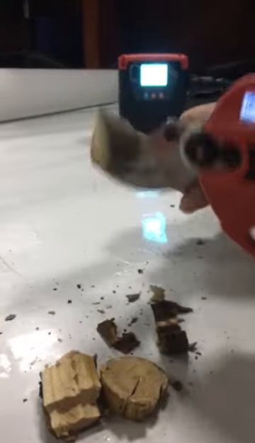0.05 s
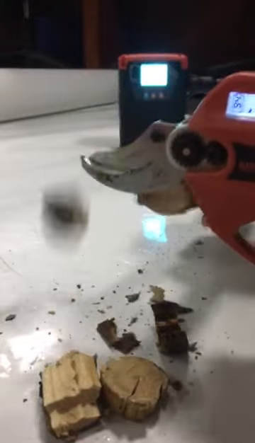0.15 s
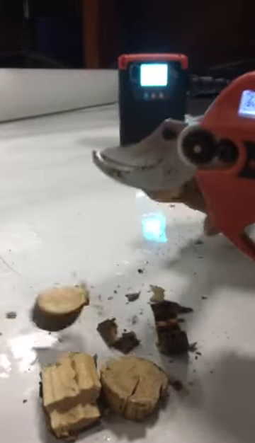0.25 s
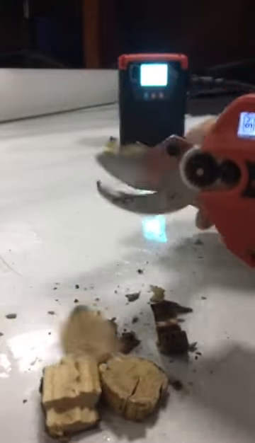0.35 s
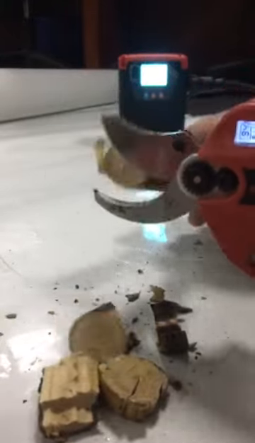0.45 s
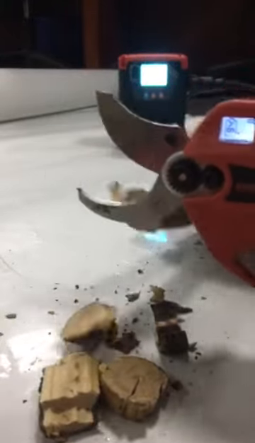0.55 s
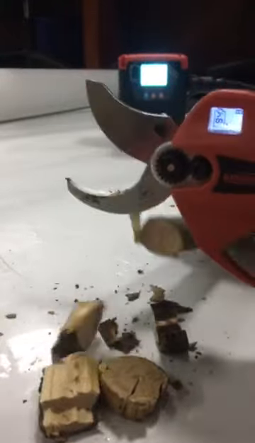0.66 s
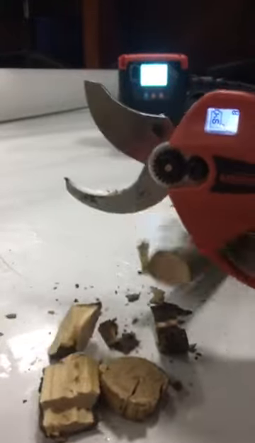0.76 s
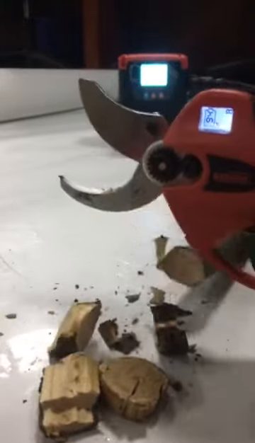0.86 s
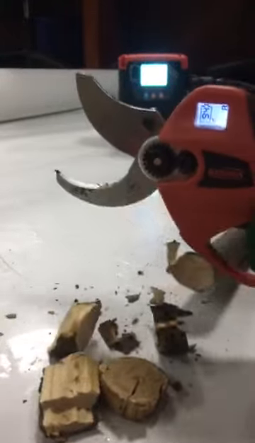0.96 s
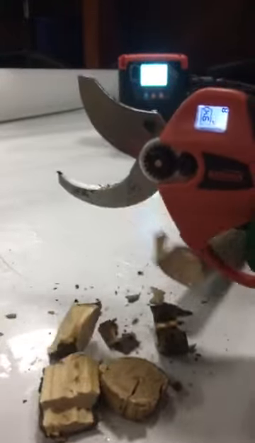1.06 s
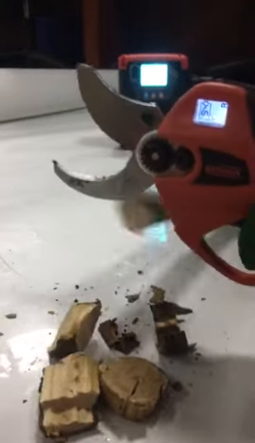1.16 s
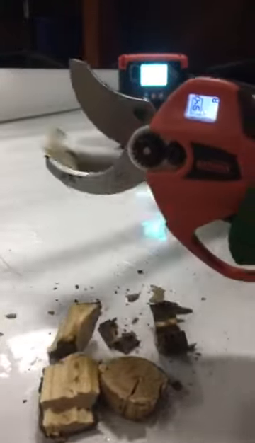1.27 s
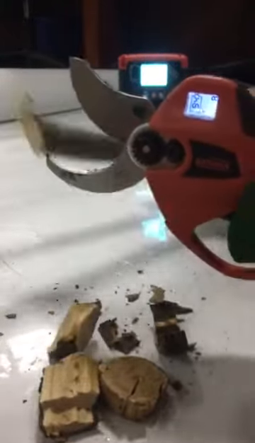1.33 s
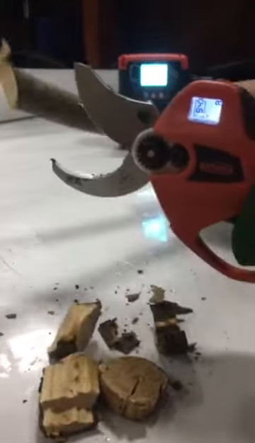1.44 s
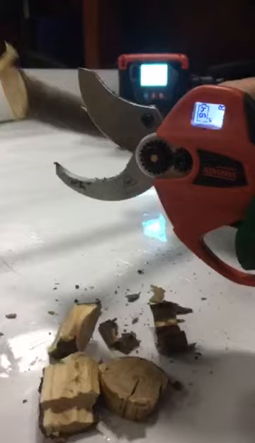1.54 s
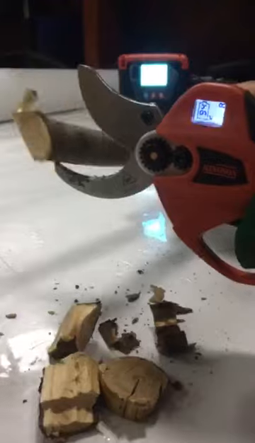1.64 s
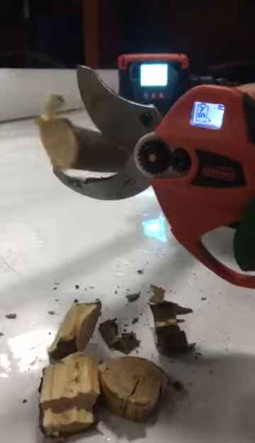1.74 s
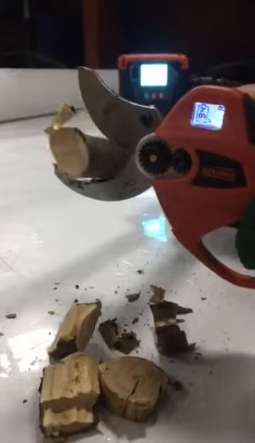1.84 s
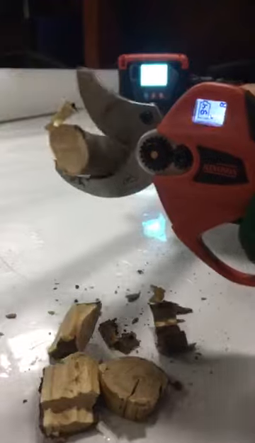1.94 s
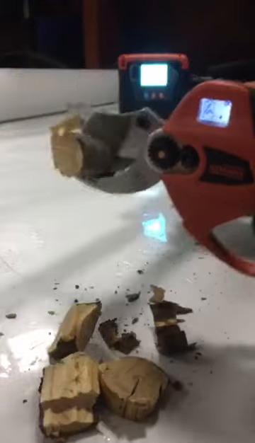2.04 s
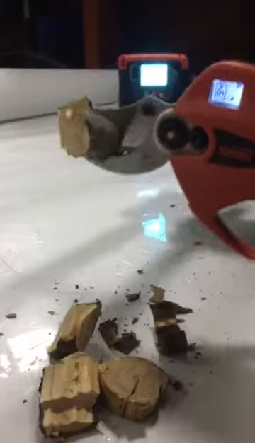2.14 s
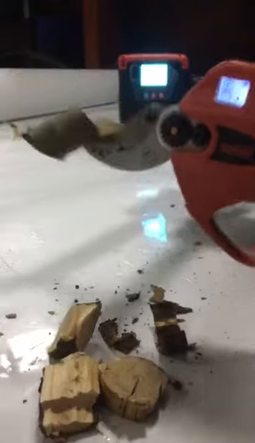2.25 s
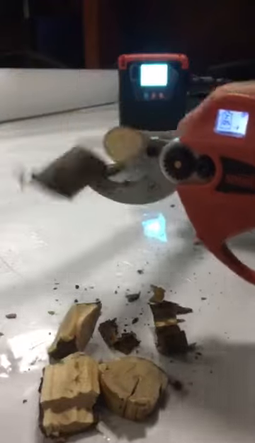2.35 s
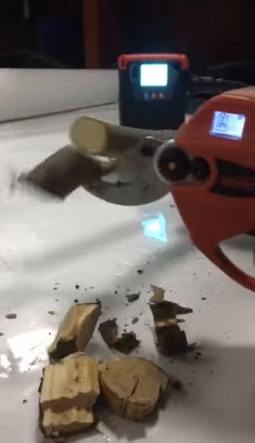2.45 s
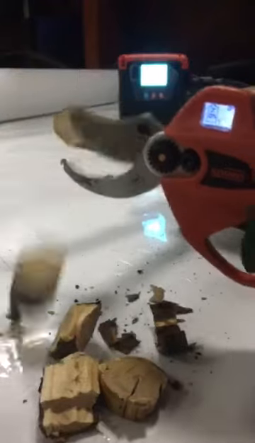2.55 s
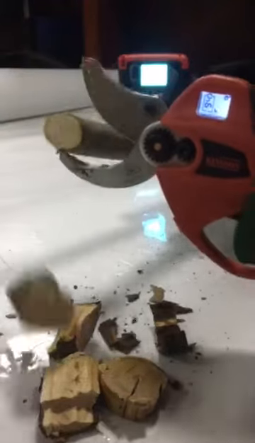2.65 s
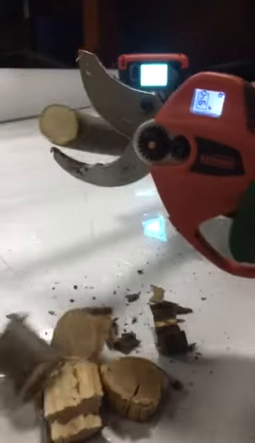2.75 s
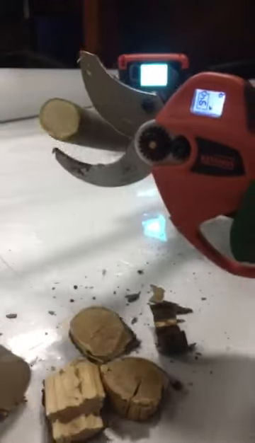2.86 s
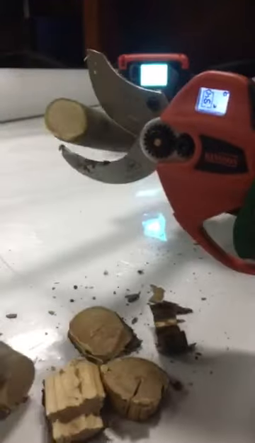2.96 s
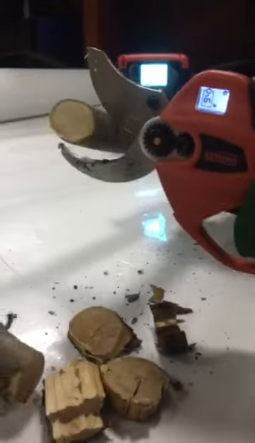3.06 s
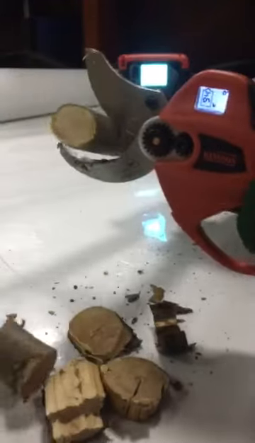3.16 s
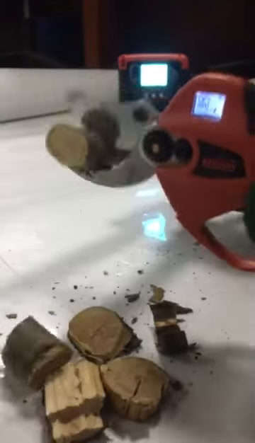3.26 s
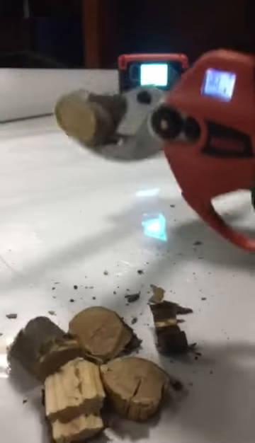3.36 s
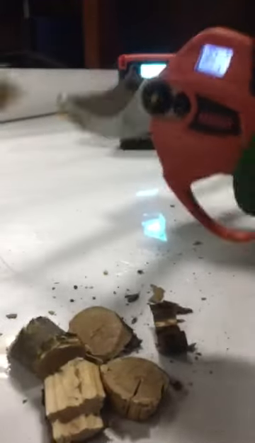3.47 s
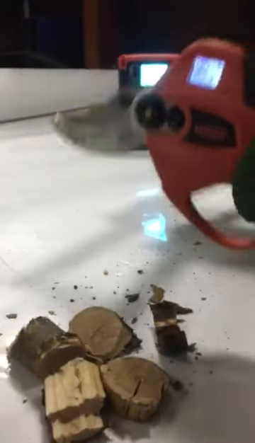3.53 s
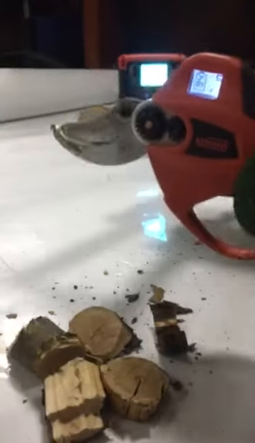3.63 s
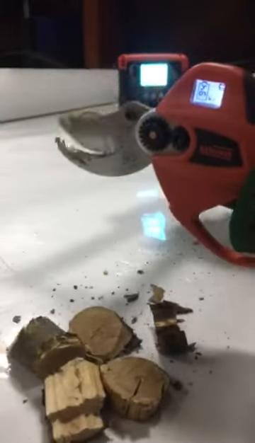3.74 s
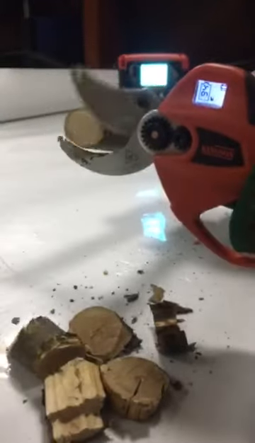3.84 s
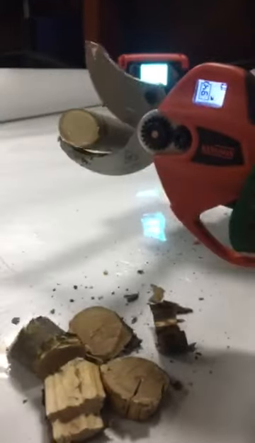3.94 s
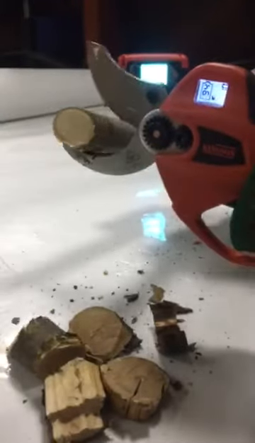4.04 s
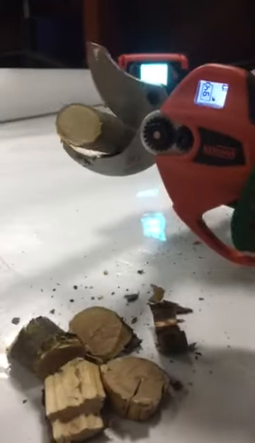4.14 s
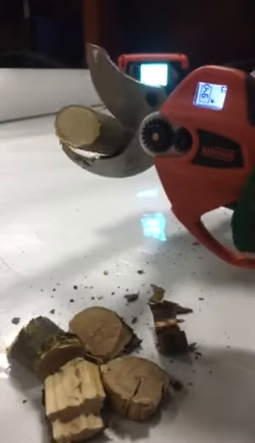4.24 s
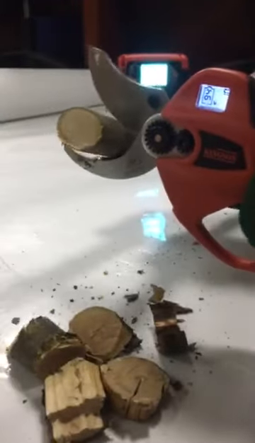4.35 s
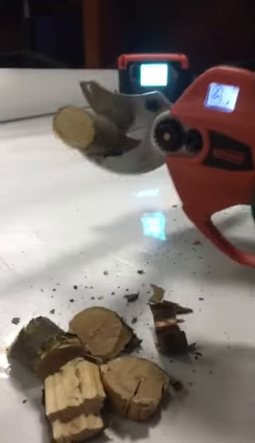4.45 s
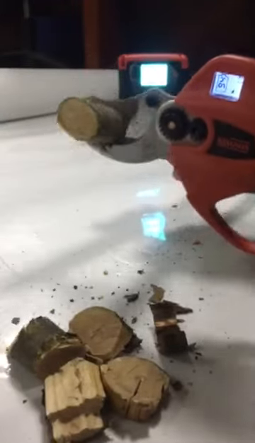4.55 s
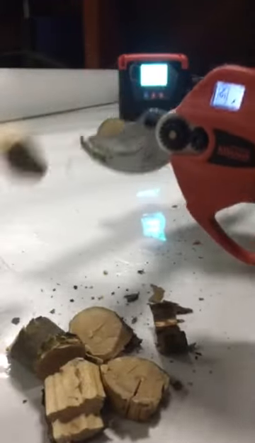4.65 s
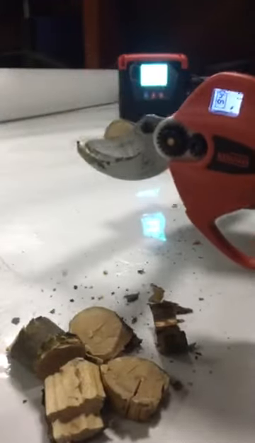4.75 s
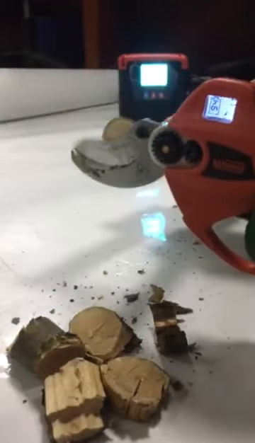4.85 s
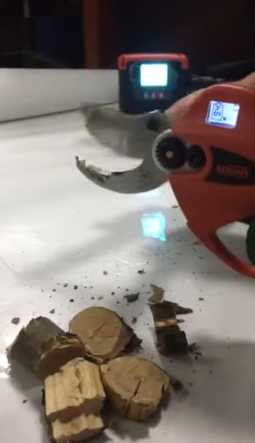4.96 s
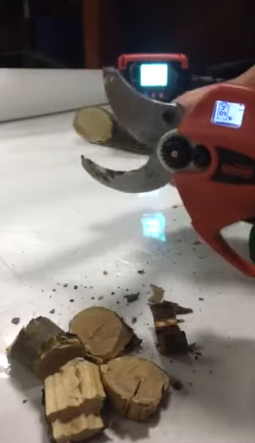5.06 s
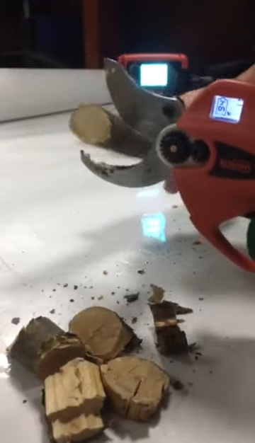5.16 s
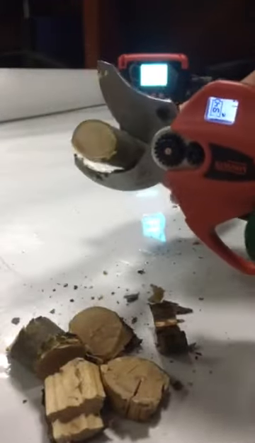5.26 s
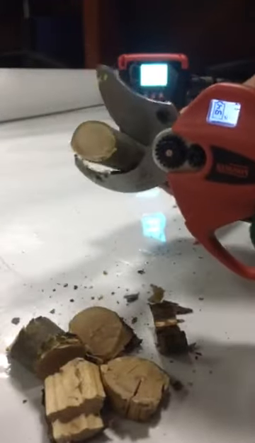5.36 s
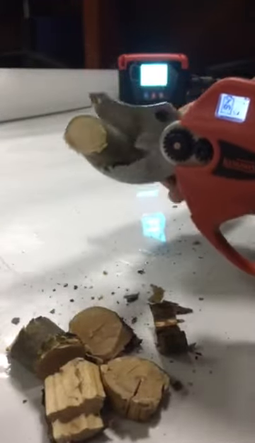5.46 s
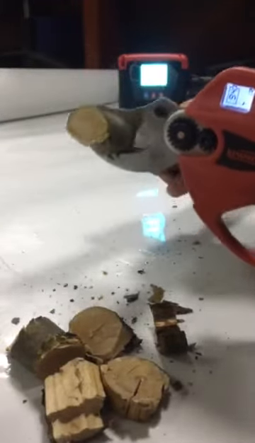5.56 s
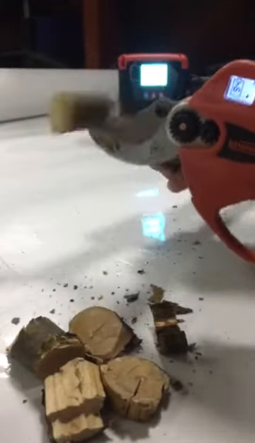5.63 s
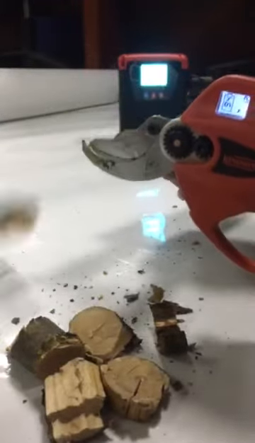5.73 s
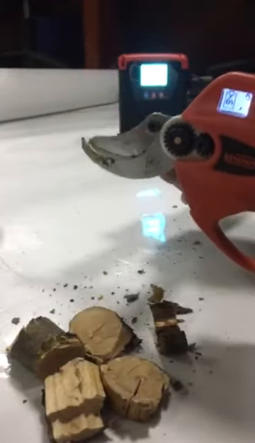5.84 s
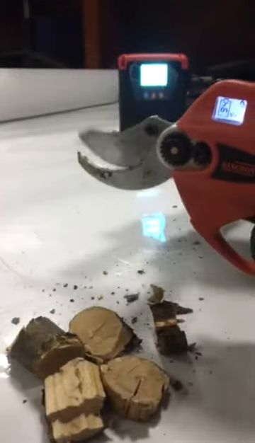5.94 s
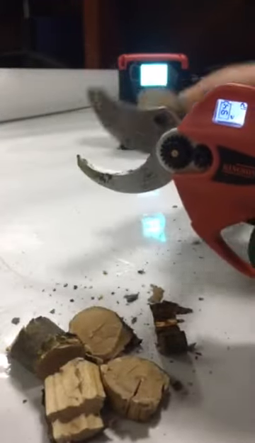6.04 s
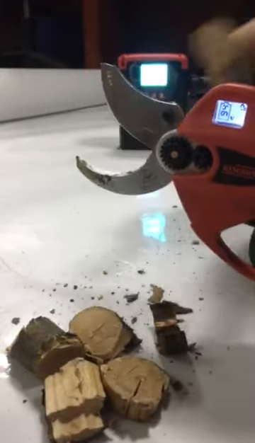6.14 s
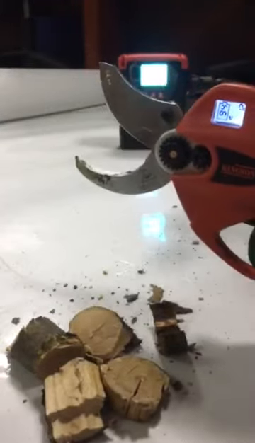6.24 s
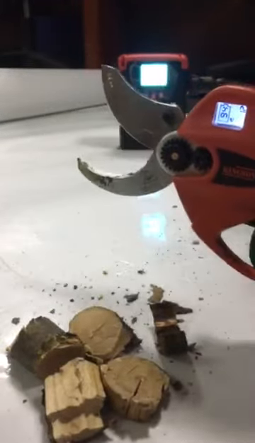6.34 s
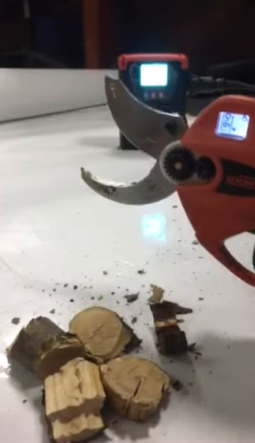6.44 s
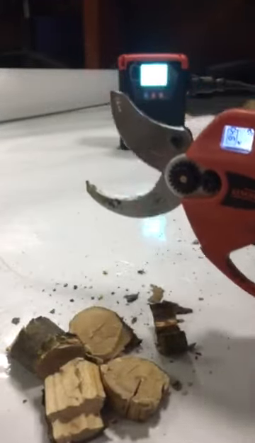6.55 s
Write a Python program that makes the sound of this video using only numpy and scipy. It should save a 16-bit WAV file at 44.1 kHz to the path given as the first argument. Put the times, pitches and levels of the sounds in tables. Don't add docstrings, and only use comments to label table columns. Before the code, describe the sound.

A battery pruning shear whirs and strains through a branch in five strokes, each ending in a sharp wood snap, with slices knocking onto a table.

```python
import sys
import numpy as np
from scipy import signal
from scipy.fft import rfft, irfft
from scipy.io import wavfile
from scipy.ndimage import uniform_filter1d

SR = 44100
rng = np.random.default_rng(int(sys.argv[2]) if len(sys.argv) > 2 else 0)


def output_pcm(signal):
    pcm = np.clip(np.atleast_2d(signal).T, -1, 1) * 32767
    wavfile.write(sys.argv[1], SR, np.round(pcm).astype(np.int16))


def rack_gain(trim_db):
    fader = np.asarray(trim_db, float)
    return 10 ** (fader / 20)


N = 291060

# pitch in Hz, level in dB per Hz.
HUM_COLOUR = [(25, -28), (40, -12.5), (54, 3.5), (66, -3.5), (85, -8.5), (120, -13.5), (160, -48)]
HUM_DB, HUM_SWELL_DB = -53, 1.5
# time in seconds, pitch in Hz, level in dB.
DRONE = [
    (0, 73, -50),
    (.2, 69.4, -41.5),
    (.4, 65.1, -45.5),
    (.6, 63.6, -52),
    (.7, 60, -72),
]
# pitch in Hz, level in dB per Hz.
HISS_COLOUR = [(53, -27), (90, -9.5), (146, -12.5), (171, -11), (232, -13), (423, -26), (528, -21.5),
               (743, -22), (790, -26.5), (1010, -19), (1390, -21.5), (1990, -33), (11000, -66),
               (14300, -82.5), (22000, -120)]
HISS_DB = -56

# time of top speed in seconds, run-up in seconds, gear tone under load in Hz,
# time of the snap in seconds, gear tone at the snap in Hz.
CUTS = [
    (-.15, .118, 2071, .12, 1651),
    (2.088, .116, 1519, 2.298, 2201),
    (3.342, .114, 1570, 3.545, 2052),
    (4.49, .103, 1730, 4.682, 2551),
    (5.523, .108, 1631, 5.71, 2050),
]
LOADED_DB = [-35, -30, -29, -29, -28.5]
SLOT_SHARE_DB = [2.5, -5, -6, -8, -7]
OVERTONE_SHARE_DB = [-3, -1, 0, 0.5, .5]
# time in seconds, width in seconds, gear tone lost in Hz.
KNOT = (.102, .03, 720)
TOP_HZ, SAG_S, RECOVER_S = 3066, .07, .019
ENGAGE = .7
ENGAGE_S = .025
UNLOADED_DB, BITE_S, BITE_DB, BITE_WIDTH_S = -35, 0.027, 4, 0.021
RELIEF_S, RELIEF_DB = .035, -14.5
OVERTONE_DB, OVERTONE_SLOW_DB, CUT_RATTLE_DB = -30, -24, -30.5
SPLINTER_DB = 4

# seconds after the snap, winding whine in dB, gear rattle in dB.
BRAKE = [
    (0, -49, -34.5),
    (.015, -41, -35),
    (.03, -37, -38.5),
    (.045, -51.5, -51.5),
    (.062, -75.5, -73),
]
# seconds after the snap, share of the speed at the snap.
BRAKE_SPEED = [(0, 1), (.012, .97), (.035, .68), (.062, .3)]
# start in seconds, winding whine at full speed in dB.
OPEN_AT = [
    (.366, -42.5),
    (2.524, -55),
    (3.749, -52),
    (4.912, -47),
    (5.954, -47),
]
FREE_TURNS = 287.1
OPEN_RUN_UP_S, OPEN_BRAKE_S, BRAKE_TURNS_PER_S2 = .09, .213, 3160
# seconds after the click, attack, hold and release in seconds, level in dB.
WHINE_UP = (0.02, 0.01, 0.0135, 0.06, -36.5)
# seconds after the click, attack, hold and release in seconds, level in dB.
WHINE_DOWN = (0.2, 0.0436, 0.011, 0.03, -31.5)
# seconds after the click, attack, hold and release in seconds, level in dB.
IDLE_RATTLE = (0.0069, 0.0368, .195, 0.0485, -33)

MESH_ORDER, SLOT_ORDER, POLE_ORDER = 10.85, 12, 28
# beats per turn, level at full speed in dB.
FREE_ORDERS = [(4, -49), (5, -41), (6, -45), (11, -49), (16, -55), (21.7, -43), (24, -55), (28, -41)]
# harmonic number, dB beside the overtone level.
HIGH_MESH = [(2, 0), (3, -3), (4, -7), (5, -6), (6, -8), (7, -8), (8, -11)]
# pitch in Hz, gain in dB.
RADIATION = [(1000, 0), (3500, 0), (4600, 1), (5500, 1), (6500, -2), (8200, -5), (9200, -11), (10800, -2),
             (12000, 1), (14000, -15)]
# pitch in Hz, gain in dB.
MESH_RADIATION = [(1000, -1.5), (1750, 0), (2100, -3.5), (2500, 1), (3100, -2)]
# pitch in Hz, level in dB per Hz.
RATTLE_COLOUR = [(180, -51.5), (300, -28.5), (643, -8), (807, -12.5), (1700, -4.5), (2100, -8),
                 (2770, -7.5), (4970, -5), (5480, -8), (10100, -11.5), (11700, -10.5), (13200, -13),
                 (14500, -25)]
# pitch in Hz, level in dB per Hz.
IDLE_COLOUR = [(300, -21.5), (900, -19), (1500, -14), (2700, -15), (3400, -14), (5400, -10.5), (6200, -9),
               (6700, -15.5), (7100, -7.5), (7700, -15), (8900, -20.5), (10600, -23.5), (12200, -10.5),
               (13600, -23), (14500, -54)]
# pitch in Hz, width in Hz, level in dB.
HOUSING = [(1570, 280, 9.5), (2800, 620, 0.5), (3615, 280, 9), (5440, 370, 3)]
SWITCHING_HZ, SWITCHING_DB = 10050, -60
# pitch in Hz, level in dB per Hz.
SWITCHING_COLOUR = [(4000, -39), (6500, -9), (9500, 7.0), (11500, -4.5), (14000, -39)]

# time in seconds, peak in dB, centre in Hz.
CRACKS = [(0.112, -23, 7050), (0.119, -0.5, 7070), (2.1996, -11.5, 4590), (2.2714, -6.5, 3250),
          (2.279, -6.5, 11100), (2.293, 1, 11700), (2.2975, -14.5, 4390), (3.5314, -8.5, 5640),
          (3.542, -1.5, 4020), (4.6785, -2, 4392), (5.6286, -6.5, 3530), (5.7004, -8, 3690),
          (5.7168, -0.5, 3030)]
# time in seconds, peak in dB, centre in Hz, low knock in dB, its pitch in Hz.
KNOCKS = [(0.326, -16, 2700, -31, 700), (0.3366, -14.5, 2566, -24.5, 438), (0.345, -26, 2360, -43, 634),
          (0.843, -30.5, 2900, -46.5, 307), (0.9462, -57, 2970, -38, 327), (0.9772, -49, 2830, -44.5, 275),
          (2.6829, -14.5, 2970, -28, 503), (2.8254, -26, 3270, -43, 545.5), (2.832, -21, 2760, -32, 445),
          (3.7539, -23, 2520, -26, 360), (4.8529, -33, 2901, -29, 347), (4.8582, -26, 2450, -23, 436),
          (4.8924, -44, 2150, -40, 250), (4.9019, -34, 2470, -43, 371), (5.901, -24.5, 2460, -27.5, 304),
          (6.1596, -28, 2910, -30.5, 440.5), (6.2719, -36, 3480, -39, 430)]
# time in seconds, peak in dB, centre in Hz.
TAPS = [(0.7085, -39, 2490), (0.7727, -36, 2400), (0.8175, -43, 2660), (0.8899, -37, 2390),
        (0.9245, -47, 2320), (1.0007, -36, 1980), (1.1135, -41, 2140), (1.2331, -50, 3890),
        (1.7342, -50, 2340), (1.8267, -55.5, 5170), (2.868, -32, 2890), (2.9096, -29, 2700),
        (2.9646, -41.5, 2350), (3.0673, -41.5, 4440), (3.1051, -49, 2090), (5.2246, -37.5, 5290),
        (5.329, -40, 2319)]
TAP_LOW_DB, TAP_LOW_HZ = -53, 380
# time in seconds, peak in dB, pitch in Hz.
BUMP = (3.748, -31, 120)
# time in seconds, peak in dB.
TRIGGERS = [
    (0.3658, -18.5),
    (1.9789, -17),
    (2.523, -16.5),
    (3.237, -17),
    (3.7476, -18),
    (4.399, -16.5),
    (4.913, -16),
    (5.4242, -16.5),
    (5.9541, -16),
]
# pitch in Hz, level in dB, seconds to die by 60 dB (not used:
TRIGGER_MODES = [(1500, 10, 0.038), (2450, 14.5, 0.019), (4430, 9, 0.042), (5640, 7.5, 0.021),
                 (7660, 14, 0.018), (8700, -42.5, 0.31), (9792, -51.5, 5.0), (11530, -69.5, 0.013)]
# start in seconds, attack in seconds, release in seconds, level in dB.
RUSTLE = [
    (.73, .07, 0.26, -60),
    (.81, 0.034, .025, -53),
    (.995, 0.009, .12, -56),
    (1.19, 0.046, .06, -63),
    (1.32, .022, .035, -68),
    (6.25, .1, 0.45, -66.5),
]
# pitch in Hz, level in dB per Hz.
BARK_COLOUR = [(800, -55), (2000, 8), (6000, -6), (12000, -9), (15000, -28)]
# pitch in Hz, seconds to die by 60 dB.
ROOM_T60 = [(200, .5), (1500, 0.52), (5000, 0.52), (12000, 0.3)]
ROOM_DB = -16.5
CUTOFF_HZ = 15100


def rms_one(x):
    return x / np.sqrt(np.mean(x ** 2) + 1e-20)


def in_time(rows, start=0, silent=-120):
    s, *columns = np.transpose(rows)
    t = np.arange(N) / SR - start
    return [np.interp(t, s, column, silent, silent) for column in columns]


def at_hz(points, hz):
    table_hz, value = np.transpose(points)
    return np.interp(np.log(hz + 1), np.log(table_hz), value)


def coloured(x, spectrum):
    gain = rack_gain(at_hz(spectrum, np.fft.rfftfreq(N, 1 / SR)))
    return rms_one(irfft(rfft(x) * gain, N))


def resonance(x, hz, width_hz):
    r = np.exp(-np.pi * width_hz / SR)
    feedback = [1, -2 * r * np.cos(2 * np.pi * hz / SR), r * r]
    return signal.lfilter([(1 - r * r) / 2, 0, (r * r - 1) / 2], feedback, x)


def wobble(rate_hz):
    low_pass = signal.butter(2, rate_hz, fs=SR / 16, output="sos")
    coarse = rms_one(signal.sosfilt(low_pass, rng.standard_normal(N // 16 + 2)))
    return np.interp(np.arange(N) / 16, np.arange(len(coarse)), coarse)


def envelope(start, attack, hold, release, db):
    corners = start + np.cumsum([0, attack, hold, release])
    return rack_gain(db) * np.interp(np.arange(N) / SR, corners, [0, 1, 1, 0])


def add(out, s, sound):
    i = round(s * SR)
    out[i:i + len(sound)] += sound[:N - i]


def burst(hz, t60, spread):
    t = np.arange(2000) / SR
    dying = rng.standard_normal(2000) * rack_gain(-60 * t / t60)
    puff = resonance(dying, hz, hz * spread)
    return puff / np.abs(puff).max()


def background():
    hum = rack_gain(HUM_DB + HUM_SWELL_DB * wobble(2.5)) * coloured(rng.standard_normal(N), HUM_COLOUR)
    hz, db = in_time(DRONE)
    drone = rack_gain(db) * np.sin(2 * np.pi * np.cumsum(hz) / SR)
    return hum + drone + rack_gain(HISS_DB) * coloured(rng.standard_normal(N), HISS_COLOUR)


def run_up(before, length):
    return np.cos(np.pi / 2 * np.clip(before / length, 0, 1)) ** 2


def closing(top, length, loaded_hz, snap, snap_hz, loaded_db):
    t = np.arange(N) / SR
    engaged = top - ENGAGE * length
    on = envelope(engaged, ENGAGE_S, snap - engaged - ENGAGE_S, 1e-4, 0)
    giving = np.exp(np.clip((t - snap) / RECOVER_S, -20, 0))
    rising = run_up(top - t, length)
    knot_hz = KNOT[2] * np.exp(-((t - KNOT[0]) / KNOT[1]) ** 2)
    sagging = loaded_hz + (TOP_HZ - loaded_hz) * np.exp(-((t - top) / SAG_S) ** 2) - knot_hz
    last = sagging[round(snap * SR)]
    hz = np.where(t < top, TOP_HZ * rising, sagging + (snap_hz - last) * giving) * (on > 0)
    bitten = np.clip((t - top) / BITE_S, 0, 1)
    bite_db = BITE_DB * np.exp(-((t - top - BITE_S) / BITE_WIDTH_S) ** 2)
    relief_db = RELIEF_DB * np.clip(1 - (snap - t) / RELIEF_S, 0, 1)
    mesh = on * rack_gain(UNLOADED_DB + bitten * (loaded_db - UNLOADED_DB + bite_db) + relief_db)
    upper = on * rack_gain(OVERTONE_DB + OVERTONE_SLOW_DB * (1 - rising) + relief_db)
    return hz, mesh, upper, on * rack_gain(CUT_RATTLE_DB + SPLINTER_DB * giving)


def opening(start):
    t = np.arange(N) / SR - start
    braking = np.clip(1 - BRAKE_TURNS_PER_S2 * (t - OPEN_BRAKE_S) / FREE_TURNS, 0, 1)
    return t, run_up(OPEN_RUN_UP_S - t, OPEN_RUN_UP_S) * braking


def drive():
    turns, mesh, slot, upper, whine, rattle, idle, free = np.zeros((8, N))
    strokes = zip(CUTS, LOADED_DB, SLOT_SHARE_DB, OVERTONE_SHARE_DB)
    for (top, length, loaded_hz, snap, snap_hz), loaded_db, slot_db, upper_db in strokes:
        hz, line, overtones, teeth = closing(top, length, loaded_hz, snap, snap_hz, loaded_db)
        whine_db, after_db = in_time(BRAKE, snap)
        brake_share = in_time(BRAKE_SPEED, snap, silent=0)[0]
        turns += (hz + brake_share * snap_hz) / MESH_ORDER
        mesh += line
        upper += overtones * rack_gain(upper_db)
        slot += line * rack_gain(slot_db)
        whine += rack_gain(whine_db)
        play = envelope(top - ENGAGE * length - .016, .004, .014, 0.017, -44)
        rattle += teeth + rack_gain(after_db) + play
    for start, steady_db in OPEN_AT:
        t, share = opening(start)
        turns += FREE_TURNS * share * (t > 0)
        whine += share ** 12 * rack_gain(steady_db)
        whine += envelope(start + WHINE_UP[0], *WHINE_UP[1:])
        whine += envelope(start + WHINE_DOWN[0], *WHINE_DOWN[1:])
        idle += envelope(start + IDLE_RATTLE[0], *IDLE_RATTLE[1:])
        free += share ** 12
    levels = (mesh, slot, upper, whine, rattle, idle, free)
    smooth = [uniform_filter1d(level, size=150) for level in levels]
    return uniform_filter1d(uniform_filter1d(turns, size=450), size=450), *smooth


def switching(turns, angle, whine):
    carrier = 2 * np.pi * SWITCHING_HZ * np.arange(N) / SR + 1.0 * wobble(200)
    powered = signal.lfilter([.0006], [1, -.9994], turns > 1)
    slow = powered * np.clip(1 - turns / 200, 0, 1)
    tones = np.sin(carrier) + 0.24 * np.sin(carrier - 7 * angle)
    line = rack_gain(SWITCHING_DB + 3.0 * wobble(80)) * slow * tones
    hiss = coloured(rng.standard_normal(N), SWITCHING_COLOUR)
    return line + rack_gain(-2.5) * uniform_filter1d(whine, size=900) * hiss


def motor():
    turns, mesh, slot, upper, whine, rattle, idle, free = drive()
    angle = 2 * np.pi * np.cumsum(turns) / SR
    beat = (1 + 0.31 * np.cos(1.6 * angle)) * rack_gain(3.6 * wobble(120) + 1.5 * wobble(25))
    tooth = MESH_ORDER * angle + .12 * np.sin(angle) + .25 * wobble(260)
    tones = beat * mesh * rack_gain(at_hz(MESH_RADIATION, MESH_ORDER * turns)) * np.sin(tooth)
    for k, level_db in HIGH_MESH:
        radiated_db = at_hz(RADIATION, k * MESH_ORDER * turns)
        waver_db = 4 * wobble(90) + 1.5 * wobble(22)
        tones += upper * rack_gain(level_db + radiated_db + waver_db) * np.sin(k * tooth)
    tones += upper * rack_gain(-7 + 30 * (turns / 287 - 1)) * np.sin(POLE_ORDER * angle)
    winding = np.sin(SLOT_ORDER * angle + 0.33 * wobble(200))
    tones += (whine + slot) * rack_gain(3.0 * wobble(100)) * winding
    for k, level_db in FREE_ORDERS:
        tones += free * rack_gain(level_db + 2.5 * wobble(37)) * np.sin(k * angle)
    uneven = rack_gain(1.5 * rng.exponential(1, N))
    tooth_knocks = rng.standard_normal((2, N)) * uneven * (1 + .12 * np.cos(angle))
    noise = rattle * coloured(tooth_knocks[0], RATTLE_COLOUR) + idle * coloured(tooth_knocks[1], IDLE_COLOUR)
    top = signal.sosfiltfilt(signal.butter(4, 10800, "high", fs=SR, output="sos"), noise)
    thinning = np.clip(1 - (turns / 287) ** 4, 0, 1) * np.clip(1.0 - mesh * 45, 0, .75)
    noise = (noise - top * thinning) * rack_gain(-0.5) * rack_gain(wobble(60))
    lines = np.sqrt(2) * tones
    body = sum(rack_gain(db - 10.5) * resonance(lines + noise, hz, width) for hz, width, db in HOUSING)
    return noise + rack_gain(-1) * lines + body + switching(turns, angle, whine)


def cracks():
    out = np.zeros(N)
    for s, db, hz in CRACKS:
        spike = 0.87 * burst(11800, .006, 0.48) + burst(hz, .014, 3.0)
        wood = .4 * burst(2200, 0.04, 1.0) + 0.17 * burst(500, .06, 1.3)
        add(out, s + .001, rack_gain(db - 4.5) * (spike + wood))
    return out


def knocks():
    out = np.zeros(N)
    light = [(*tap, TAP_LOW_DB, TAP_LOW_HZ) for tap in TAPS]
    for s, db, hz, low_db, low_hz in KNOCKS + light:
        tick = signal.sosfilt(signal.butter(1, 2.2 * hz, fs=SR, output="sos"), burst(hz, .012, .9))
        add(out, s, rack_gain(db + 1.5) * tick)
        thud = burst(low_hz, 0.032, 0.31) + .5 * burst(900, 0.034, 0.45) + .35 * burst(200, 0.1, 0.7)
        add(out, s + 0.0033, rack_gain(low_db + 2.5) * thud)
    bump_s, bump_db, bump_hz = BUMP
    add(out, bump_s, rack_gain(bump_db) * burst(bump_hz, 0.034, 0.83))
    return out


def triggers():
    out, t = np.zeros(N), np.arange(1500) / SR
    contact = np.clip(t / .0004, 0, 1) * (t < .006) + 0.38 * np.exp(-t / 0.022)
    for s, db in TRIGGERS:
        chatter = rng.standard_normal(1500) * contact
        click = 0.073 * chatter
        for hz, level_db, t60 in TRIGGER_MODES:
            click += rack_gain(level_db) * resonance(chatter, hz, 300 + hz * 0.04)
        click = signal.sosfilt(signal.butter(4, 9800, fs=SR, output="sos"), click)
        add(out, s, rack_gain(db) * click / np.abs(click).max())
    return out


def rustle():
    grains = rng.standard_normal(N) * rack_gain(3.0 * rng.exponential(1, N))
    strength = sum(envelope(s, rise, 0, fall, db) for s, rise, fall, db in RUSTLE)
    return strength * coloured(grains, BARK_COLOUR)


def workshop(x):
    t, tail = np.arange(SR // 2) / SR, 0
    for hz in 177 * 2 ** np.arange(7):
        band = signal.butter(2, [hz / np.sqrt(2), hz * np.sqrt(2)], "band", fs=SR, output="sos")
        octave = signal.sosfilt(band, rng.standard_normal(len(t)))
        tail = tail + octave * rack_gain(-60 * t / at_hz(ROOM_T60, hz))
    tail = tail * np.clip(t / 0.0037, 0, 1)
    return signal.fftconvolve(x, tail / np.sqrt(np.sum(tail ** 2)))[:N]


def scene():
    near = motor() + cracks() + knocks() + triggers() + rustle()
    return (near + rack_gain(ROOM_DB) * workshop(near) + background())[None]


def roll_off(x):
    return signal.sosfilt(signal.butter(12, 15260, fs=SR, output="sos"), x)


def record(dry):
    rounded = .75 * np.tanh(dry / .75)
    low_pass = signal.cheby2(10, 60, CUTOFF_HZ, fs=SR, output="sos")
    mix = signal.sosfilt(low_pass, rounded)
    return roll_off(mix)


dry = scene()
out = record(dry)
output_pcm(out)
```